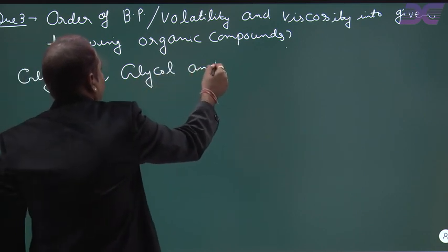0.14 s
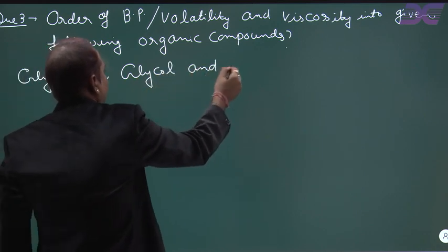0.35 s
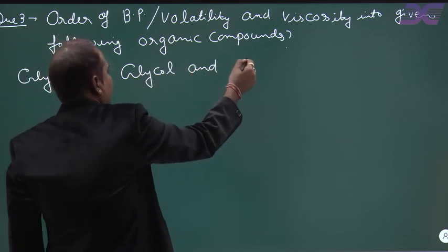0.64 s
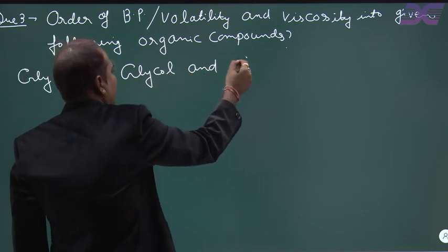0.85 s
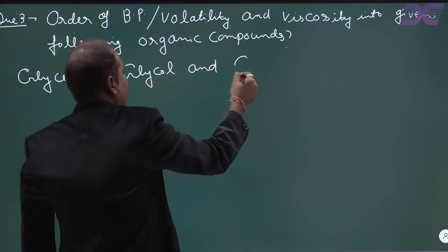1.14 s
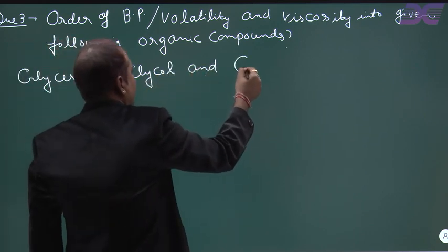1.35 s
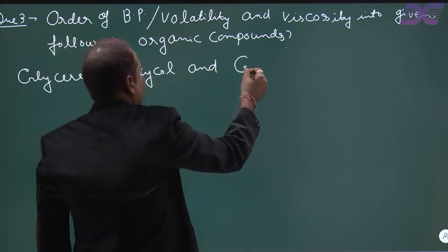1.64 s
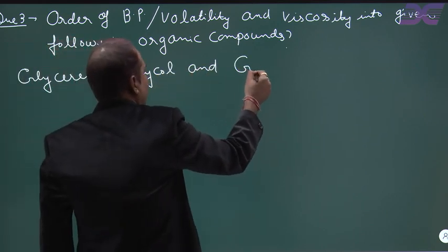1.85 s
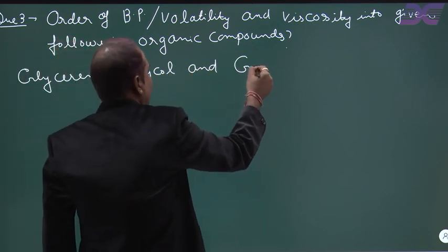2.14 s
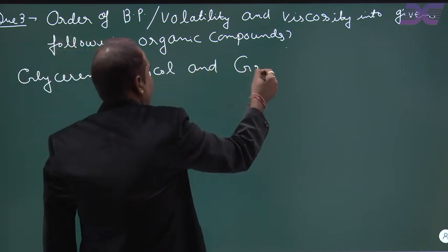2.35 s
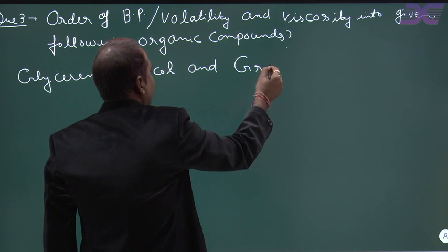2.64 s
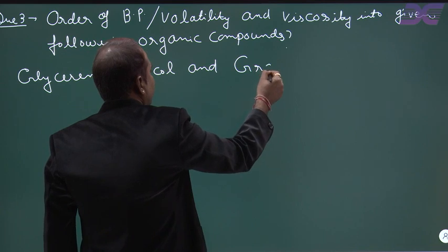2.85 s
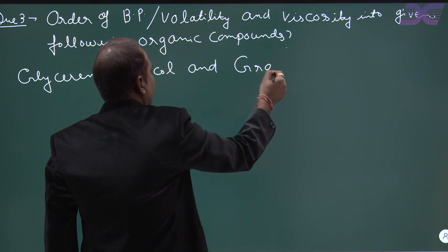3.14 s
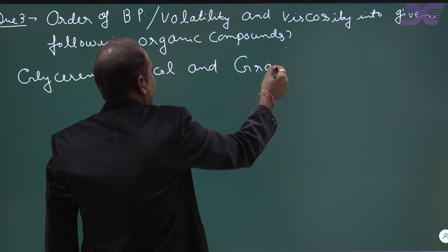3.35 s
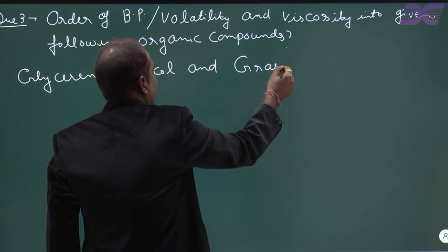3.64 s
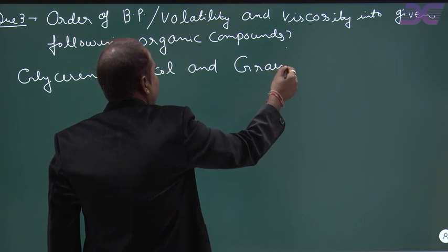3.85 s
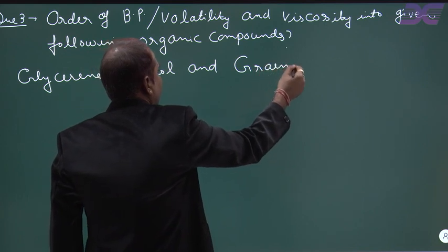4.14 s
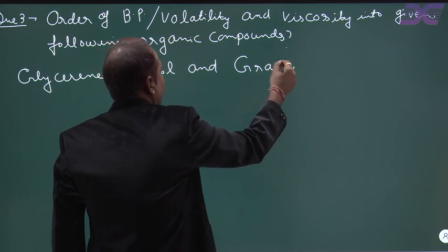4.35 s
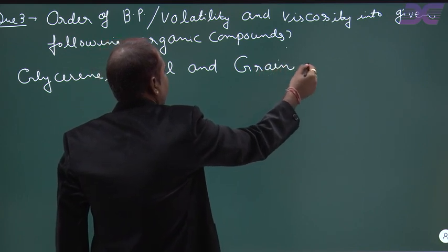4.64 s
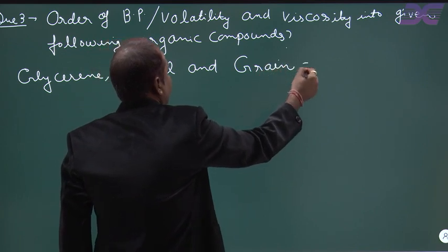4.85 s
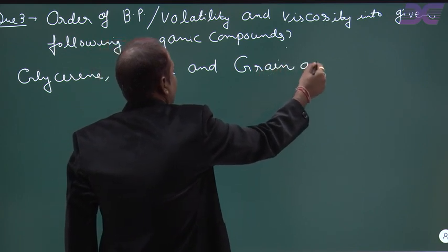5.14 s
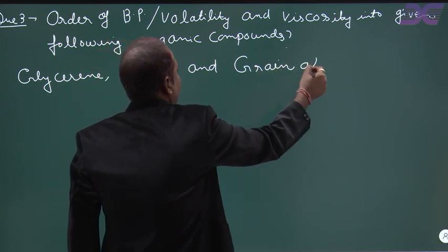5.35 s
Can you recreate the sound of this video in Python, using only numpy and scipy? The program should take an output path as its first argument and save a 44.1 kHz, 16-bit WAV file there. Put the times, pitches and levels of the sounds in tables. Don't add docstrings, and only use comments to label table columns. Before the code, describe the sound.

A clip-on microphone on a jacket picks up chalk writing on a classroom board. Cloth rubs, crackles and bumps, busiest in the first second or so, while faint bright strokes scratch in short bursts. Soft taps land near 0.7, 1.9 and 2.6 seconds; a sharp hard tap at 4.3 is followed by a lesser one at 4.7, then more scratching. Soft hiss and mains hum stay underneath.

```python
import sys
import numpy as np
from scipy import signal
from scipy.fft import rfft, irfft, next_fast_len
from scipy.io import wavfile
from scipy.ndimage import uniform_filter1d, map_coordinates

SR = 44100
rng = np.random.default_rng(int(sys.argv[2]) if len(sys.argv) > 2 else 0)


def boost_factor(decibels):
    exponent = np.asarray(decibels, float) / 20
    return 10 ** exponent


def materialize(psi):
    bounded = np.clip(np.atleast_2d(psi).T, -1, 1)
    quanta = np.round(bounded * 32767).astype(np.int16)
    wavfile.write(sys.argv[1], SR, quanta)


N = 242197
T = np.arange(N) / SR

# start in seconds, click level in dB, board level in dB,
# click tilt in dB per octave, board tilt in dB per octave.
TAPS = [
    (0.6742, -28, -10.5, -3.5, -1.3),
    (1.9163, -24, -6, -3.3, 1),
    (2.6263, -23, -11.5, -2.5, -2),
    (4.281, -8.5, -13.5, -2.7, 1.7),
    (4.688, -19.5, -13.5, -0.5, -1.4),
]


def unit(x):
    return x / np.sqrt(np.mean(x ** 2) + 1e-20)


def along(points, hz):
    f, v = np.transpose(points)
    return np.interp(np.log(hz + 1), np.log(f + 1), v)


def wobble(rate):
    knots = rng.standard_normal(int(N * rate / SR) + 4)
    return map_coordinates(knots, [T * rate])


def filtered(x, response):
    m = 2 * next_fast_len(len(x) // 2 + 4096)
    return irfft(rfft(x, m) * response(np.fft.rfftfreq(m, 1 / SR)), m)[:len(x)]


def modes(table):
    def response(f):
        total = 0
        for k, (hz, width, db) in enumerate(table):
            damping = 1j * f * width
            total = total + (-1) ** k * boost_factor(db) * damping / (hz * hz - f * f + damping)
        return total
    return response


def noise(spectrum, grit_db=0):
    grains = rng.standard_normal(N) * boost_factor(grit_db * rng.exponential(size=N))
    return unit(filtered(grains, lambda f: boost_factor(along(spectrum, f))))


def swells(middle_s, length_s, db, growth=1, rest_db=-150):
    power = np.full(N, boost_factor(rest_db) ** 2)
    for s, length, top in zip(middle_s, length_s, db):
        near = abs(T - s) < length / 2
        speed = np.cos(np.pi * (T[near] - s) / length)
        power[near] += boost_factor(top) ** 2 * speed ** (2 * growth)
    return np.sqrt(power)


def room():
    # frequency in Hz, level in dB per Hz.
    hiss_colour = [(12, -51), (20, -10), (110, -8.5), (237, -9.5), (520, -10.5), (939, -16), (2660, -29),
                   (15500, -34)]
    # frequency in Hz, level in dB.
    mains = [(100, -58.5), (200, -65.5)]
    hum = np.zeros(N)
    for hz, db in mains:
        level = boost_factor(db + 3 + 2.4 * wobble(8.9))
        hum += level * np.sin(2 * np.pi * hz * T + 0.45 * wobble(7.2))
    return boost_factor(-57 + 0.44 * wobble(1.9)) * noise(hiss_colour) + hum


def jacket():
    # frequency in Hz, level in dB per Hz.
    sway_colour = [(15, -19), (28, 19), (70, 11), (110, -45)]
    rub_colour = [(60, -1.5), (100, 8), (200, 4.5), (350, -3), (500, -31.5)]
    fold_colour = [(250, -52), (400, 4), (800, -9.5), (1600, -17), (2200, -56)]
    fizz_colour = [(900, -7.5), (1900, -3.5), (2550, -0.5), (3300, -8), (6000, -5.5), (9000, -6.5),
                   (15000, -47)]
    # middle in seconds, length in seconds, level in dB.
    shifts = [(0.047, .12, -52), (0.158, 0.076, -49), (.45, .2, -45.5), (0.728, 0.14, -51),
              (0.846, 0.13, -53), (1.013, 0.12, -52), (1.142, 0.099, -47), (1.335, 0.089, -55),
              (1.646, 0.13, -48.5), (1.953, 0.12, -50), (2.533, 0.16, -45.5), (3.133, .17, -47.5),
              (3.674, 0.15, -46), (3.834, .35, -51), (3.985, 0.096, -48), (4.198, 0.11, -46),
              (4.352, 0.55, -49), (4.754, 0.13, -43.5), (5.26, 0.17, -48.5), (5.44, .2, -52)]
    # middle in seconds, length in seconds, level in dB.
    slides = [(0.035, 0.24, -46.5), (0.154, 0.12, -50.5), (.43, 0.32, -47), (0.728, 0.24, -51.5),
              (0.841, 0.1, -42.5), (1.018, 0.16, -44), (1.138, 0.2, -44.5), (1.282, .15, -54),
              (1.561, 0.064, -48), (1.66, 0.14, -49), (1.967, 0.13, -53), (2.08, 0.17, -51),
              (2.747, 0.22, -49.5), (3.178, .1, -50.5), (3.31, 0.14, -49), (3.82, 0.21, -50.5),
              (3.983, .12, -52), (4.44, 0.54, -50.5), (4.773, .3, -52), (5.066, 0.49, -51.5)]
    # middle in seconds, length in seconds, fold level in dB, fizz level in dB.
    creases = [(0.017, 0.24, -49, -68), (0.189, 0.044, -51, -70), (0.298, 0.28, -59, -64.5),
               (0.375, 0.12, -60, -59), (0.434, .1, -49.5, -45), (0.483, .08, -55, -52),
               (0.61, .12, -60, -61), (0.825, .025, -50.5, -66), (0.868, 0.069, -55, -60),
               (1.004, .15, -54, -59.5), (1.122, 0.11, -56, -75), (1.257, 0.16, -68, -66),
               (1.747, 0.17, -74, -75), (3.293, 0.21, -65, -76), (3.9, .4, -59.5, -74),
               (5.148, 0.26, -61.5, -61)]
    sway_gain = swells(*np.transpose(shifts), rest_db=-61)
    rub_gain = swells(*np.transpose(slides), rest_db=-54)
    s, length, fold_db, fizz_db = np.transpose(creases)
    lumps = boost_factor(2.4 * wobble(22))
    sway = sway_gain * unit(noise(sway_colour) * boost_factor(1.56 * wobble(4.46)))
    rub = rub_gain * unit(noise(rub_colour) * lumps)
    fold = swells(s, length, fold_db) * unit(noise(fold_colour) * lumps)
    fizz = boost_factor(-3) * swells(s, length, fizz_db) * noise(fizz_colour, grit_db=2.8)
    return sway + rub + fold + fizz


def patches(x, patchy_db):
    z = signal.stft(x, nperseg=384)[2]
    field = uniform_filter1d(rng.standard_normal(z.shape), size=2, axis=0)
    field = uniform_filter1d(field, size=22, axis=1)
    return signal.istft(z * boost_factor(patchy_db * unit(field)), nperseg=384)[1][:N]


def strokes():
    # middle in seconds, length in seconds, level in dB, lean from 0 to about 4
    lines = [(0.043, 0.1, -51.6, 0.31), (0.169, 0.14, -53, 0.8), (0.161, 0.45, -67, 0.55),
             (0.813, 0.27, -63, 0.47), (0.968, 0.5, -63.6, 0.9), (1.05, 0.166, -72, 3.9),
             (1.168, 0.318, -59.9, 1.34), (1.344, 0.15, -62.5, 0.94), (1.498, 0.21, -62, 1.6),
             (1.685, 0.24, -61.5, 0.85), (2.01, 0.212, -59.5, 1.24), (2.09, 0.25, -64, 1.5),
             (2.227, 0.25, -59.5, 2.4), (2.37, 0.18, -63, 1.2), (2.718, 0.21, -62.5, 1.08),
             (2.842, 0.35, -60.0, 1.71), (3.1, 0.18, -65.5, 1.2), (3.184, 0.16, -60, 2.32),
             (3.262, 0.14, -64.5, 0.63), (3.487, 0.43, -63, 1.4), (3.698, 0.14, -63, 1.3),
             (3.813, 0.138, -61, 0.67), (3.99, 0.188, -62.5, 1.3), (4.088, 0.13, -57, 1),
             (4.752, 0.086, -57, 0.95), (4.834, 0.247, -58.5, 1.15), (5.06, 0.209, -59, 1.8),
             (5.163, 0.15, -56.5, 0.29), (5.3, 0.247, -59.5, 0.93), (5.374, 0.094, -59.5, 1.8)]
    # frequency in Hz, width in Hz, level in dB, growth with speed.
    singing = [(6600, 640, -3.5, 0.84), (8240, 1200, -3, 1), (10500, 1800, 1.5, 2.5), (13800, 780, -9, 2.7)]
    # frequency in Hz, level in dB per Hz.
    dust_colour = [(1500, -29), (2600, -5), (3300, -12), (4600, -1.5), (7000, 0.5), (11000, -5.5),
                   (12600, -5), (15500, -9.5)]
    s, length, line_db, lean = np.transpose(lines)
    gains = []
    for k, (_, _, _, growth) in enumerate(singing):
        off_lean_db = 4 * (k - lean) ** 2
        gains.append(swells(s, length, line_db + 1.5 - off_lean_db, growth))

    grain_db = 2.7 * np.minimum(rng.exponential(size=N), 5.5)
    grains = rng.standard_normal(N) * boost_factor(grain_db + 1.65 * wobble(60))
    dust = unit(filtered(grains, lambda f: boost_factor(along(dust_colour, f))))
    out = boost_factor(-4.5) * np.sqrt(np.sum(np.square(gains), axis=0)) * dust
    for gain, (hz, width_hz, db, _) in zip(gains, singing):
        pitch = hz * (1 + 0.013 * wobble(6) + 0.0094 * wobble(14))
        turn = 2 * np.pi * np.cumsum(pitch) / SR

        def narrow(f):
            return 1 / (1 + 2j * f / width_hz) / (1 + .7j * f / width_hz)
        across = filtered(grains * np.cos(turn), narrow)
        up = filtered(grains * np.sin(turn), narrow)
        song = unit(across * np.cos(turn) + up * np.sin(turn))
        out += boost_factor(db - 6.5 + 1.1 * wobble(25.04)) * gain * song
    return patches(out, patchy_db=3.2)


def knocks():
    # start in seconds, level in dB, pitch in Hz, fade by 60 dB in seconds.
    thumps = [(0.19, -32.5, 258, 0.033), (0.328, -36.5, 190, 0.081), (0.424, -31, 159, 0.08),
              (0.475, -33, 124, 0.054), (0.495, -28.5, 131, 0.032), (0.817, -20.5, 169, 0.03),
              (0.8273, -20, 175, 0.022), (0.8308, -22, 109, 0.044), (0.856, -38, 102, 0.074),
              (0.877, -31.5, 111, 0.056), (1.019, -38.5, 94.2, 0.098), (1.05, -31.5, 170, 0.034),
              (1.106, -43, 124, 0.094), (1.135, -33, 117, 0.045), (1.549, -35.5, 133, 0.084),
              (2.549, -42, 104, 0.041), (2.798, -40, 260, 0.03), (3.669, -36.5, 71.5, 0.051)]
    # start in seconds, level in dB, pitch in Hz, fade by 60 dB in seconds.
    ticks = [(0.745, -32, 560, 0.022), (0.815, -30.5, 420, 0.05), (2.55, -32, 385, 0.015),
             (0.8609, -50, 2580, 0.04), (0.8774, -54, 2480, 0.035), (2.3241, -55.5, 2520, 0.04)]
    # start in seconds, level in dB.
    letting_go = [(0.3574, -44), (0.3944, -47), (0.41, -33), (0.415, -34), (0.4234, -38), (0.426, -35),
                  (0.4326, -37), (0.439, -41), (0.4454, -43), (0.4714, -33), (0.4748, -32), (0.4953, -35.5),
                  (1.0246, -44), (4.2936, -20), (4.297, -21), (4.327, -39), (4.3887, -33), (4.3917, -40)]
    out, snaps = np.zeros(N + SR), np.zeros(N)
    t = np.arange(SR // 4) / SR
    for s, db, hz, t60 in thumps + ticks:
        turn = 2 * np.pi * hz * t * (1 - 1.2 * t)
        fade = boost_factor(db + 1 - 60 * t / t60) * (1 - np.exp(-t / 0.0013))
        out[round(s * SR):][:len(t)] += fade * np.sin(turn)
    for s, db in letting_go:
        snaps[round((s + .0008) * SR) + np.array([0, 9])] = boost_factor(db + 8.5) * np.array([1, .3])
    return out[:N] + filtered(snaps, modes([(6200, 9100, 0)]))


def dying(length):
    # frequency in Hz, fade by 60 dB in seconds.
    fades = [(150, 0.87), (400, 0.75), (1040, 0.32), (2760, 0.16), (7280, 0.091)]
    hz, t, z = signal.stft(rng.standard_normal(length), SR, nperseg=128)
    fading = boost_factor(-60 * t / along(fades, hz)[:, None])
    return signal.istft(z * fading, SR, nperseg=128)[1][:length]


def body(table, spread, tilt, pivot_hz):
    fresh = [(hz, width, db + rng.normal(0, 1.28)) for hz, width, db in table]

    def response(f):
        power = sum(abs(modes([mode])(f)) ** 2 for mode in fresh) + boost_factor(along(spread, f)) ** 2
        fold = irfft(np.log(power + 1e-10) / 2 + tilt * np.log(f / pivot_hz + .1) / 6)
        fold[1:len(fold) // 2] *= 2
        fold[len(fold) // 2 + 1:] = 0
        return np.exp(rfft(fold))
    return response


def taps():
    # frequency in Hz, width in Hz, level in dB.
    stick = [(2596, 340, -2.5), (3780, 90, -4), (4800, 270, -11), (6350, 430, 1.5), (7700, 430, -2.5),
             (8600, 470, -2.5), (10400, 700, -16), (13900, 200, -19)]
    # frequency in Hz, width in Hz, level in dB.
    board = [(502, 51, -3), (637, 41, -8), (1023, 208, -4.5), (1220, 93, -27), (1570, 31, -41),
             (1740, 80, -23), (2340, 33, -49), (2530, 28, -81)]
    # frequency in Hz, level in dB.
    stick_bed = [(1200, -4), (2200, -15), (6000, -5), (9000, -10.5), (12000, -11), (16000, -36)]
    board_bed = [(300, -25), (600, -9), (950, -15), (1400, -16), (2000, -61), (3000, -48)]
    size = 2 ** 15
    out = np.zeros(N + SR)
    t = np.arange(size) / SR
    press = np.sin(np.pi * np.clip(t / 0.0028, 0, .5))
    dent = -boost_factor(-60 * t / 0.006) * np.sin(2 * np.pi * 900 * t) * press
    hum = boost_factor(-60 * t / 0.41) * (1 - np.exp(-t / 0.036)) * np.sin(2 * np.pi * 493 * t)
    for s, db, board_db, tilt, board_tilt in TAPS:
        crack = rng.standard_normal(size) * boost_factor(-60 * t / 0.02) * (1 - np.exp(-t / 0.00023))
        click = filtered(crack + boost_factor(-15.5) * dying(size), body(stick, stick_bed, tilt, 4600))
        shaken = dying(size) * (1 - np.exp(-t / 0.00038)) + boost_factor(7.5) * crack
        ring = filtered(shaken, body(board, board_bed, board_tilt, 1130))
        boom = filtered(dying(size) * (1 - np.exp(-t / 0.0075)), modes([(207, 206, 0.0038)]))
        blow = boost_factor(4) * click + boost_factor(board_db + 16.5) * ring
        blow += boost_factor(-6 + 2 * board_tilt) * dent
        blow += boost_factor(board_db - 5.5 - 1.3 * board_tilt) * hum
        blow += boost_factor(-5) * boom
        out[round(s * SR):][:size] += boost_factor(db) * blow
    return out[:N]


def scene():
    return (room() + jacket() + strokes() + knocks() + taps())[None]


def roll_off(x):
    return signal.sosfilt(signal.butter(12, 16750, fs=SR, output="sos"), x)


def record(dry):
    starved = sum((T > s - .013) & (T < s - .002) for s, *_ in TAPS[-2:])
    treble = filtered(dry[0], lambda f: 1 / (1 + (1700 / (f + 1)) ** 6))
    kept = dry[0] - uniform_filter1d(starved * 0.97, size=60) * treble
    mix = filtered(kept, lambda f: np.clip((15800 - f) / 250 + .5, 0, 1) ** 2)
    return roll_off(mix[None])


dry = scene()
out = record(dry)
materialize(out)
```